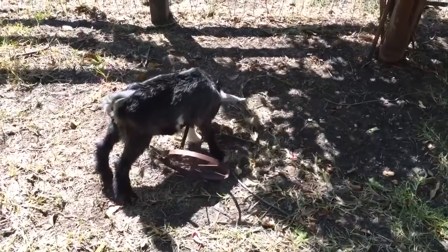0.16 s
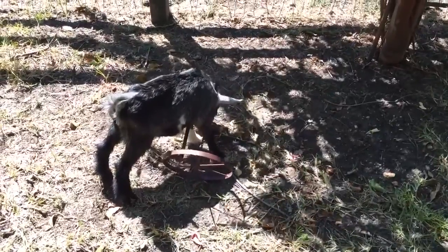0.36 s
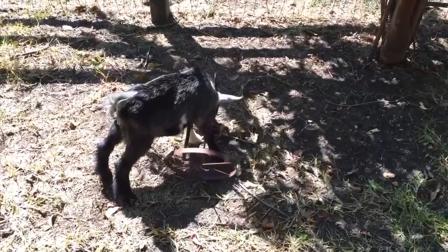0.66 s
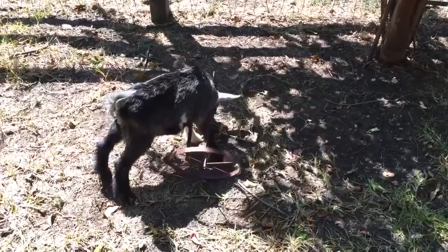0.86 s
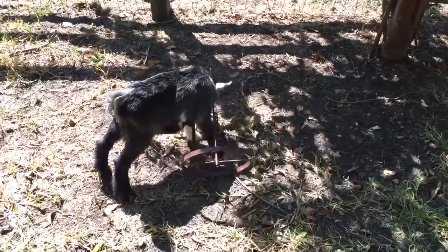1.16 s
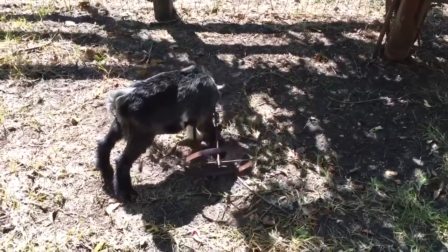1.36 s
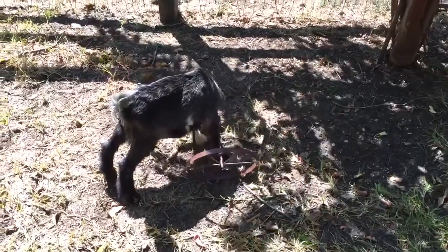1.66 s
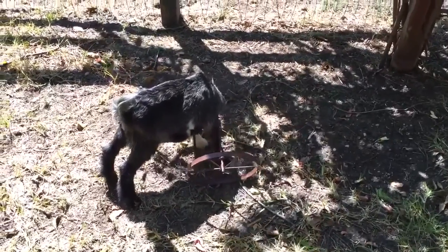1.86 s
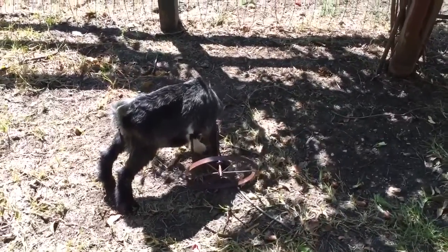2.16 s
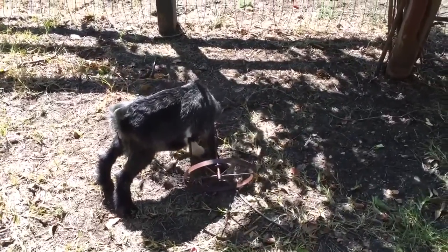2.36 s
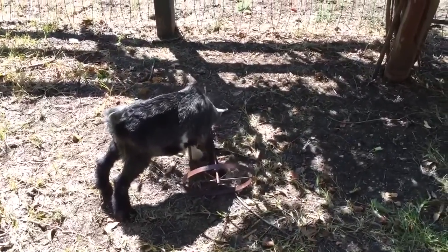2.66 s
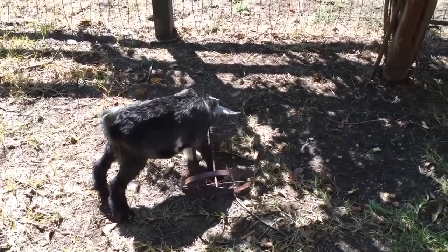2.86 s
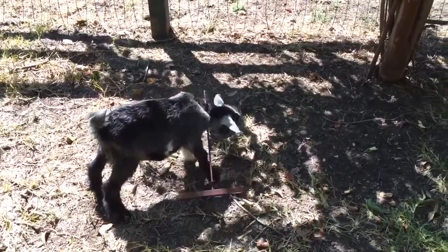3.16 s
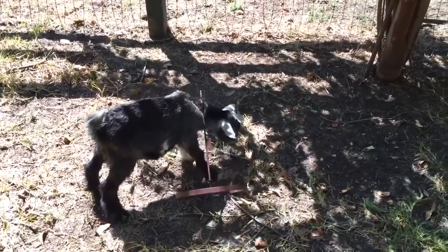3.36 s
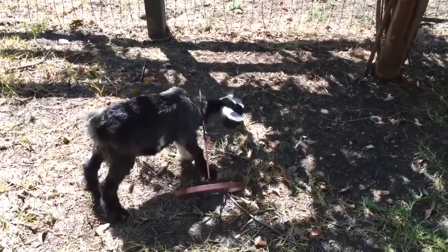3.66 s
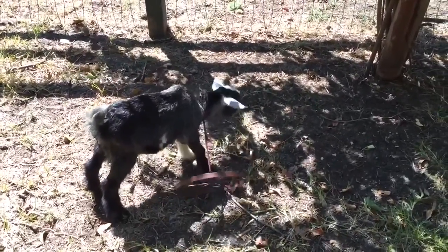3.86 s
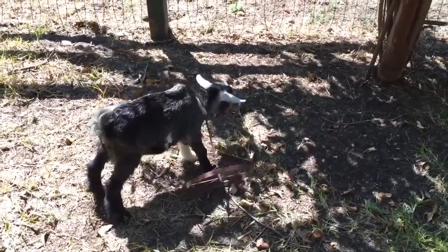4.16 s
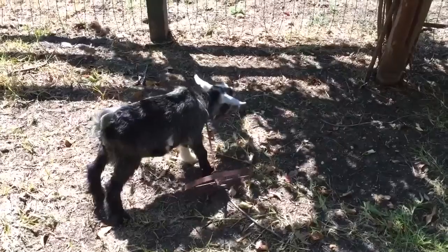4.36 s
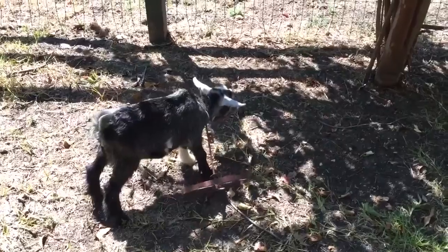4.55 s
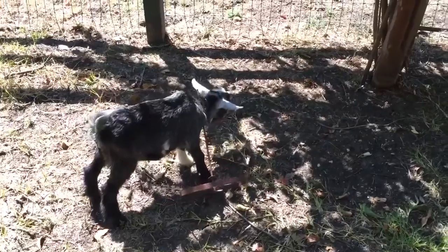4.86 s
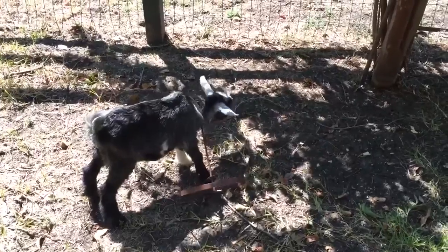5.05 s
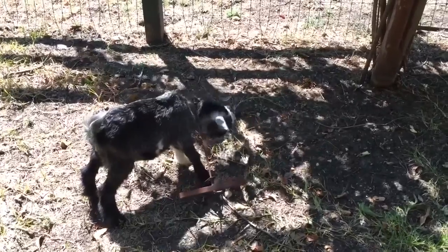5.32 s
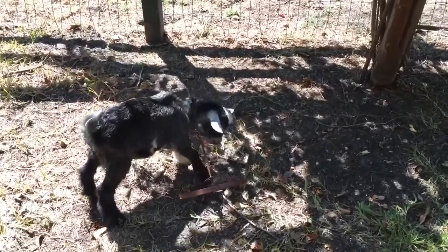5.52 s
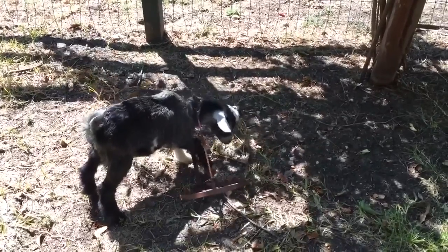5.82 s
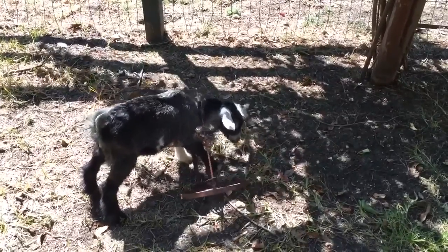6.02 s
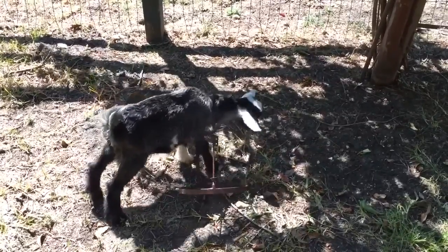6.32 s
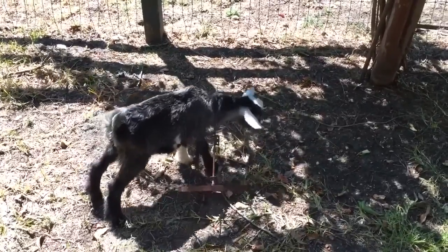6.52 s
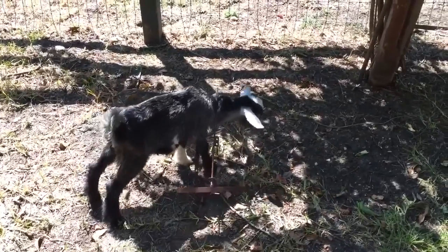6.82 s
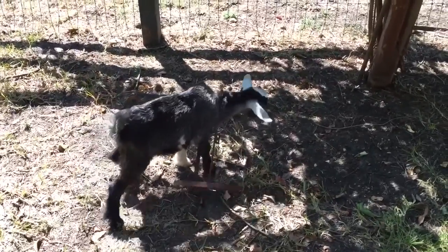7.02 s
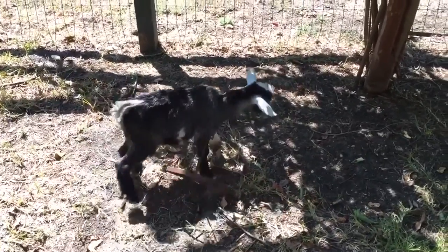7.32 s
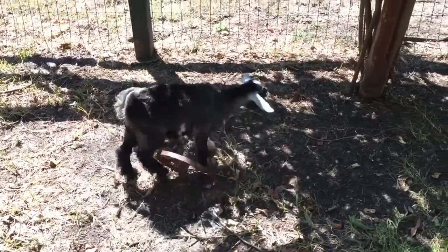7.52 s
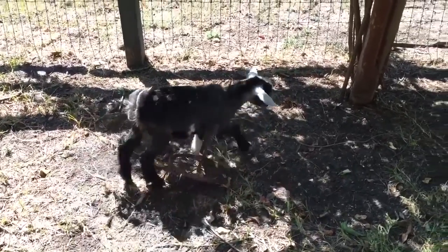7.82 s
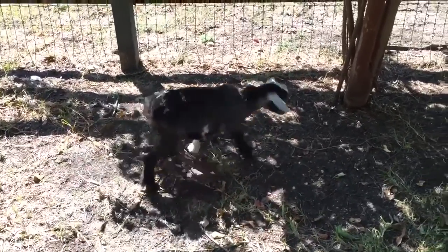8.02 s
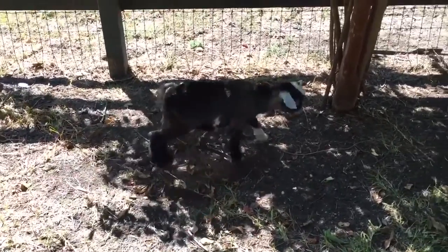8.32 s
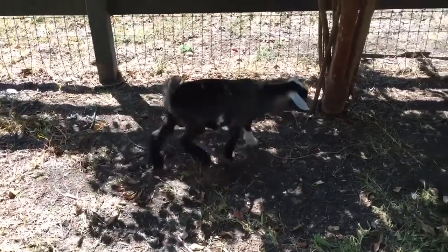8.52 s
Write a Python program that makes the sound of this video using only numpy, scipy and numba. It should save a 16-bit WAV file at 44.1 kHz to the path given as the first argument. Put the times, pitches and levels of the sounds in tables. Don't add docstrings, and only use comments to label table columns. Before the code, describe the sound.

A quiet pen with low distant rumble and thin bird trills, one sharp stick crack, and finally crunching litter with bright iron pings and clinks.

```python
import sys
import numpy as np
from scipy import signal
from scipy.fft import rfft, irfft
from scipy.io import wavfile
from scipy.ndimage import uniform_filter1d
from numba import njit

SR = 44100
rng = np.random.default_rng(int(sys.argv[2]) if len(sys.argv) > 2 else 0)


def undo_db(level):
    steps = np.asarray(level, float) / 20
    return 10 ** steps


def master_out(mix):
    frames = np.transpose(np.atleast_2d(mix))
    ceiling = np.clip(frames, -1, 1)
    pcm = np.round(ceiling * 32767).astype(np.int16)
    wavfile.write(sys.argv[1], SR, pcm)


N = 382788
TIME = np.arange(N) / SR

# hardest_s, build_up_s, die_away_s, scrape_db, rim_weight_db
TUGS = [(1.125, .01, .11, -62, 6), (1.236, .01, .09, -57, -8), (3.084, .005, .04, -57, -6),
        (3.21, .1, .05, -75, -10), (3.664, .006, .1, -62, 6), (3.918, .025, .2, -67, 0),
        (4.0, .15, .08, -66, 0), (4.048, .06, .03, -56, 1), (4.143, .006, .055, -52.5, -14),
        (4.198, .04, .035, -64, -12), (7.148, .2, .1, -64, -10), (7.234, .09, .3, -61.5, -10),
        (7.375, .04, .09, -57, -10), (7.676, .014, .03, -44.5, -6), (7.797, .02, .05, -54, -12),
        (7.821, .03, .12, -47, -8), (7.934, .12, .11, -48, -2), (8.015, .06, .04, -61, -14),
        (8.11, .12, .05, -67, -5), (8.145, .01, .08, -60, -2), (8.188, .08, .075, -54, 2),
        (8.32, .005, .22, -49.5, -6), (8.41, .07, .05, -51, -12), (7.055, .07, .05, -66, -20),
        (7.428, .05, .02, -61, -10), (7.79, .005, .03, -59, -20), (3.462, .035, .01, -62, 6),
        (3.49, .01, .08, -63, 4), (1.06, .12, .08, -69, 3), (7.885, .04, .04, -56, -6),
        (8.26, .05, .1, -68, -10), (4.095, .04, .08, -63, -8), (8.452, .03, .02, -62, -12)]
# pitch_hz, width_hz, level_db
IRON_MODES = [(2320, 34, -7), (3330, 68, -1), (3780, 62, 2), (4470, 47, -20), (5640, 12, -4),
              (6130, 39, -10), (6670, 99, -0.5), (7200, 23, -7.5), (8380, 47, -9), (8500, 63, 0.5),
              (9510, 120, 10), (10900, 60, 0), (11200, 54, -0.5), (11600, 40, -7), (12100, 80, 0.5),
              (13100, 31, -3.5), (14200, 22, -4.5), (14400, 73, -4)]
# pitch_hz, level_db (per Hz)
GRIT_COLOUR = [(3530, -49), (6000, -9), (6300, -6), (7280, 4), (7860, 2), (11300, 7.5), (15700, 2.5)]
# strongest_s, build_up_s, die_away_s, level_db, pitch_hz
RUBS = [(3.95, .03, .04, -70, 6800), (3.99, .06, .05, -70, 7400), (4.0, .08, .08, -70, 9520),
        (4.148, .01, .04, -62, 9300), (4.148, .01, .06, -61, 13100), (4.15, .01, .05, -63, 11200),
        (4.15, .01, .05, -66, 8300), (6.516, .005, .04, -70, 13100), (6.516, .005, .04, -71, 13700),
        (6.52, .005, .04, -73, 12100), (7.1, .03, .06, -70, 9520), (7.15, .04, .1, -64, 9520),
        (7.16, .1, .1, -66, 10900), (7.16, .05, .06, -70, 12600), (7.14, .05, .08, -73, 13700),
        (7.235, .05, .1, -67, 7320), (7.26, .05, .05, -71, 6790), (7.25, .03, .05, -69, 8640),
        (7.21, .02, .1, -68, 11200), (7.25, .02, .04, -68, 15000), (7.25, .05, .06, -69, 13700),
        (7.27, .05, .05, -63, 9520), (7.315, .03, .07, -63, 9520), (7.31, .02, .04, -68, 7320),
        (7.37, .01, .06, -65, 12200), (7.37, .01, .07, -62, 15100), (7.39, .04, .07, -64, 9310),
        (7.388, .01, .03, -68, 5620), (7.825, .015, .1, -56, 7050), (7.83, .02, .12, -56, 10900),
        (7.825, .015, .06, -58, 12100), (7.85, .03, .05, -60, 13600), (7.93, .03, .04, -57, 14500),
        (7.965, .02, .08, -63, 5630), (7.965, .02, .08, -64, 4800), (7.97, .02, .08, -64, 7960),
        (7.96, .02, .06, -63, 11600), (7.97, .02, .08, -64, 14200), (8.345, .02, .1, -56, 11200),
        (8.37, .02, .05, -57, 9150),
        (8.35, .03, .05, -62, 6780), (8.375, .02, .04, -61, 12100), (8.42, .015, .05, -55, 11700),
             (8.435, .01, .045, -62, 13100), (8.44, .03, .1, -63, 9520), (8.4, .01, .06, -58, 15400),
             (8.41, .015, .04, -60, 14200), (8.24, .04, .04, -71, 9520), (8.27, .03, .05, -72, 13100)]
# start_s, peak_db, strongest_hz, ring_t60_s, other_modes_db
CLINKS = [(4.139, -44, 13000, 0.09, -6), (6.1587, -62.5, 10900, 0.09, -10), (6.367, -61, 8300, 0.09, -10),
          (6.5136, -54.5, 11100, 0.11, -12), (6.58, -59.5, 6800, 0.09, -10), (7.1945, -46, 9520, 0.13, -15),
          (7.3632, -45, 13100, 0.18, -15), (7.7957, -43, 6350, 0.09, -13), (7.8176, -37.5, 6370, 0.13, -13),
          (7.9294, -42, 9680, 0.065, -8), (8.0765, -35.5, 11600, 0.075, -32),
          (8.3175, -46, 13100, 0.09, -10), (8.3351, -41, 9510, 0.069, -10), (8.3928, -40, 12100, 0.09, -8),
          (8.4283, -44, 13100, 0.09, -12)]
# start_s, peak_db, treble_centre_hz, rustle_db
TICKS = [(1.0585, -47, 11300, -25), (1.1283, -36.5, 9500, -24), (1.1438, -39, 8420, -22),
         (1.1997, -44, 11200, -21.5), (1.2341, -33.5, 10900, -22), (1.2514, -38, 7070, -18),
         (1.3104, -45, 6200, -22), (1.8058, -44, 14800, -22), (3.0795, -33, 9800, -20),
         (3.1545, -49, 11100, -17), (3.2088, -36.5, 11900, -21), (3.6022, -40, 11000, -26),
         (3.6695, -38, 12500, -22), (3.9105, -49, 6500, -22), (4.0053, -37.5, 6550, -8.5),
         (4.0255, -41, 8420, -22), (4.0487, -38, 9490, -13), (4.1255, -43, 10500, -22),
         (4.1395, -36, 11000, -20), (6.3664, -53.5, 8200, -22), (6.5605, -55, 8330, -12.5),
         (7.2744, -46.5, 9520, -19), (7.5547, -50, 14600, -22), (7.6725, -27.5, 11200, -31),
         (7.6764, -26, 8400, -28), (7.712, -33, 12700, -22), (7.7997, -40, 7060, -22),
         (7.9394, -36, 5640, -15), (8.1424, -50, 7960, -22), (8.2094, -45, 5930, -20),
         (0.9572, -56, 12700, -13), (1.0405, -61, 11400, -17), (1.0884, -59, 11770, -20),
              (1.1114, -57, 10900, -24), (1.497, -59, 13600, -20), (3.8072, -49, 13600, -16),
              (3.9515, -46, 11000, -20), (5.4784, -56, 14400, -20), (5.5159, -63, 11600, -20),
              (5.5817, -64, 11200, -20), (5.9923, -64, 15300, -21), (0.9617, -54, 12500, -18),
              (1.003, -63, 9500, -20), (3.112, -58, 12000, -20), (3.489, -48, 6500, -12),
              (4.0028, -48, 9000, -20), (6.567, -58, 11000, -20), (7.0532, -57, 14500, -14),
              (7.765, -56, 8000, -20), (7.401, -54, 8000, -20), (7.424, -52, 8500, -20),
              (7.944, -42, 8000, -20), (8.3925, -42, 12000, -18)]
# start_s, peak_db, pitch_hz, t60_s
KNOCKS = [(1.128, -32, 3400, .006), (1.234, -52, 3800, .006), (1.251, -39, 2720, .008),
          (1.403, -50, 2040, .012), (3.0797, -30, 5200, 0.0025), (3.478, -30, 1500, .012),
          (3.6022, -45, 2400, 0.0025), (3.6699, -27, 1380, 0.0055), (3.6695, -27, 2400, 0.0055),
          (4.051, -29, 2600, 0.003), (4.0513, -30, 3900, 0.003), (7.675, -40, 3000, 0.011),
          (3.4633, -14, 1500, .0016), (3.6695, -28, 6750, .0028), (3.6695, -26, 9300, .0025),
          (3.6696, -34, 3100, .004), (3.67, -38, 800, .008), (3.0797, -40, 2700, .005),
          (7.363, -52, 11300, .1), (7.94, -40, 2300, 0.0099), (3.4777, -18.5, 6200, 0.0025),
          (3.478, -21.5, 9700, 0.0022), (3.4777, -31, 12700, .002), (2.938, -63, 4270, 0.043),
          (7.84, -57, 1285, 0.22), (7.9, -54.5, 2320, 0.14), (8.345, -58, 1443, 0.2),
          (8.33, -47.5, 3780, 0.12), (7.8, -52, 3780, .08)]
# pitch_hz, width_hz, level_db
SNAP_MODES = [(1270, 330, 0), (2390, 520, -5), (6030, 1500, -15), (12000, 4000, -22)]
# kind, start_s, first_hz, last_hz, level_db
PHRASES = [
    [("trill", 2.076, 3550, 3310, -64), ("warble", 2.243, 3310, 3340, -61.5),
     ("clear", 2.335, 3270, 3440, -58.5)],
    [("chip", 2.77, 3750, 3600, -78), ("chip", 2.808, 3520, 3450, -64), ("trill", 2.828, 3300, 3270, -55),
     ("chip", 2.912, 3400, 3560, -66), ("warble", 2.959, 3370, 3280, -58.5),
     ("clear", 3.089, 3326, 3305, -49.5)],
    [("chip", 3.812, 3700, 3650, -64), ("chip", 3.835, 3550, 3500, -68), ("trill", 3.853, 3300, 3350, -60),
     ("chip", 3.917, 3340, 3400, -59), ("warble", 3.948, 3380, 3350, -66),
     ("trill", 4.003, 3400, 3380, -66), ("clear", 4.095, 3310, 3295, -55)],
    [("chip", 5.265, 3720, 3680, -68), ("warble", 5.343, 3320, 3330, -70),
     ("warble", 5.438, 3310, 3290, -66.5), ("clear", 5.59, 3200, 3215, -61)],
    [("trill", 6.087, 3900, 3860, -70), ("trill", 6.188, 3620, 3380, -72),
     ("warble", 6.329, 3400, 3380, -67), ("clear", 6.426, 3270, 3250, -64)],
    [("trill", 8.225, 3300, 3190, -60.5), ("warble", 8.33, 3310, 3340, -58.5),
     ("clear", 8.454, 3240, 3310, -54)],
]
NOTE_KINDS = {"chip": (30, .032, .006, -2), "trill": (110, .125, .012, 0), "warble": (27, .14, .018, -2),
              "clear": (12, .052, .004, 1)}
# start_s, clear_s, blurred_s, second_partial_hz, level_db
CALLS = [
    (.84, .095, .18, 2900, -60.5),
    (1.122, .062, .045, 2548, -56.5),
]
# multiple, level_db, split_share (in the blur)
CALLER_PARTIALS = [(1, -17, .3), (1.5, -19, 0), (2, 0.5, .8), (2.5, -20, .3), (3, -11.5, 0), (4, -21, .6),
                   (4.5, -21, .3)]
# strongest_s, build_up_s, die_away_s, level_db
PUFFS = [
    (.07, .06, .05, -46),
    (.148, .08, .04, -46),
    (.274, .036, .04, -31.5),
    (.56, .065, .015, -52),
    (.672, .04, .055, -32),
    (1.806, .045, .022, -50),
    (1.905, .03, .08, -41.5),
]
# time_s, centre_hz, level_db
DRONE = [(0.0, 62, -46), (0.3, 70, -49), (0.48, 78, -70), (0.85, 75, -66), (1.11, 78, -48),
         (1.96, 77, -45.5), (2.15, 75, -52), (2.3, 94, -49), (3.09, 96, -51), (3.3, 85, -58),
         (4.0, 90, -54), (4.3, 72, -53), (4.72, 90, -55), (5.0, 64, -59), (5.5, 74.5, -48.5),
         (6.88, 72, -51), (7.2, 74, -57.5), (8.68, 73, -49.5)]
# pitch_hz, level_db (per Hz)
AIR_COLOUR = [(30, 10.5), (70, 14), (130, 11), (200, 5.5), (320, -1.5), (480, -5.5), (650, -1.5), (900, -2),
              (1300, -7), (2000, -13.5), (2900, -16.5), (5900, -18), (8000, -23.5), (15700, -29.5)]
# pitch_hz, width_hz, level_db
INSECTS = [(3900, 600, -81), (5700, 900, -86.5)]


def drag():
    tugs, weight_db = swells(TUGS), np.transpose(TUGS)[4]
    scrape, heavy, rough = (stretch(undo_db(k * weight_db) @ tugs) + 1e-9 for k in (0, 1, .45))
    grain_size = undo_db(2.0 * np.minimum(rng.exponential(size=N), 5.5))
    grit = unit(noise() * (rng.random(N) < .3) * grain_size)
    push = scrape * undo_db(1.5 * walk(140))

    hiss_bands = octaves(unit(colour(grit, GRIT_COLOUR)), 4470, 0.31)
    hiss = sum(undb(2.1 * walk(45)) * part for part in hiss_bands)
    crunch = heavy / scrape * undo_db(-3.5) * unit(steep_band(grit, 2450, 2200))
    rasp = rough / scrape * undo_db(-5 + 2.9 * walk(50)) * unit(steep_band(grit, 4050, 4100))

    pings = np.zeros(N)
    for when, mode, detune, size, damp in rng.random((3000, 5)):
        s = 3.9 + 4.7 * when
        i = int(s * SR)
        hz, _, db = IRON_MODES[int(mode * len(IRON_MODES))]
        if scrape[i] > undo_db(-95):
            pitch_hz = hz * (1 + 0.39 * (detune - .5) ** 3)
            t60 = .025 + 0.09 * damp ** 2
            add(pings, s, push[i] * undo_db(.5 * db - 11 * size) * ring(pitch_hz, t60, .08))
    return undo_db(-3.5) * push * (hiss + crunch + rasp) + undo_db(-4.8) * pings


def rubs():
    width_hz, level_db = 50, 1.2
    out, rows, lead = np.zeros(N), RUBS, int(.15 * SR)
    grits = rng.standard_normal((len(rows), 3 * lead))
    for row, gain, grit in zip(rows, swells(rows), grits):
        i = int(row[0] * SR) - lead
        push = stretch(gain)[i:i + 3 * lead]
        tone = band(push * grit[:len(push)], row[4], width_hz)
        add(out, i / SR, undo_db(level_db) * tone / np.sqrt(np.pi * width_hz / SR))
    return out


def clinks():
    out = np.zeros(N)
    soft = 1 - np.exp(-TIME[:int(.3 * SR)] / .001)
    for s, db, hz, t60, rest_db in CLINKS:
        rest = 0
        for mode_hz, _, mode_db in IRON_MODES:
            luck, detune = rng.standard_normal(2)
            if mode_hz > 6000:
                far_db = 9 * abs(np.log2(mode_hz / hz))
                gain = undo_db(rest_db + 0.5 * mode_db + 3.3 * luck - far_db)
                rest = rest + gain * ring(mode_hz * (1 + 0.0033 * detune), t60)
        pair = ring(hz, t60) + .45 * ring(1.022 * hz, .6 * t60)
        add(out, s, undo_db(db - 10.5) * soft * (pair + rest))
    return out


def ticks():
    out, t = np.zeros(N), TIME[:1500]
    for s, db, hz, rustle_db in TICKS:
        burst = rng.standard_normal((2, len(t)))
        crack = steep_band(burst[0] * np.exp(-t / 0.00063), hz, 11000)
        rustle = undo_db(rustle_db) * band(burst[1], hz, 9000) * np.exp(-t / 0.015)
        add(out, s, undo_db(db) * (crack / np.abs(crack).max() + rustle))
    onset = 1 - np.exp(-TIME[:int(.12 * SR)] / 0.00015)
    for s, db, hz, t60 in KNOCKS:
        add(out, s, undo_db(db) * ring(hz, t60, .12) * onset)
    return out


def snap():
    snap_s, snap_db = 3.4635, -6.9
    out, t = np.zeros(N), TIME[:9000]
    swing = 0
    for k, (hz, width_hz, db) in enumerate(SNAP_MODES):
        build_up = 1 - np.exp(-t[:int(.03 * SR)] * hz / 0.31)
        sign = -(-1) ** k
        swing = swing + sign * undo_db(db) * ring(hz, np.log(1000) / np.pi / width_hz, .03) * build_up
    add(out, snap_s, undo_db(snap_db) * swing / np.abs(swing).max())

    scatter = band(band(rng.standard_normal(len(t)), 1100, 1200), 1200, 1500)
    scatter = scatter * (np.exp(-t / 0.0093) + .03 * np.exp(-t / .11))
    splinters = band(band(rng.standard_normal(len(t)), 3900, 3000), 4800, 3996)
    splinters = splinters * np.exp(-((t - .011) / 0.005) ** 2)
    add(out, snap_s, undo_db(-18.5) * scatter + undo_db(-36) * splinters)
    return out


def whistling_bird():
    return voice(song_notes(), [(1, 0, 0)], base=1, warble_rate=48, flutter_db=2.4,
                 hoarse=0.45, rising=.8, split_hz=100)


def song_notes():
    after_s, after_db, after_trill_hz = .14, -13.5, 19
    notes = []
    for phrase in PHRASES:
        nexts = [note[1] for note in phrase[1:]] + [np.inf]
        for (kind, start, first_hz, last_hz, db), after in zip(phrase, nexts):
            trill, longest, breath, change_db = NOTE_KINDS[kind]
            end = max(min(start + longest, after - breath), start + .01)
            notes.append([(start, first_hz, db - change_db / 2, trill),
                          (end, last_hz, db + change_db / 2, trill)])
        notes.append([(end + breath, last_hz, db + after_db, after_trill_hz),
                      (start + after_s, last_hz, db + after_db - 5, after_trill_hz)])
    return notes


def hoarse_caller():
    return voice(call_notes(), CALLER_PARTIALS, base=.5, warble_rate=37, flutter_db=3.4,
                 hoarse=0.45, rising=.55, split_hz=85)


def call_notes():
    attack_s, break_s, sag_db, blur_db = .016, .022, -1.5, -7.5
    clear_hz, blur_hz, arch_hz_per_s = 8, 45, 330
    notes = []
    for s, clear, blurred, hz, db in CALLS:
        arch = arch_hz_per_s * blurred
        low, clear_end = hz - arch / 2, s + clear
        blur_end = clear_end + max(blurred, break_s + .002)
        notes.append([(s, low, db - 8, clear_hz),
                      (s + attack_s, low, db, clear_hz),
                      (clear_end, hz + arch / 2, db + sag_db, clear_hz),
                      (clear_end + break_s, hz + arch, db + blur_db, blur_hz),
                      (blur_end, low, db + blur_db / 2, blur_hz / 2)])
    return notes


def voice(tables, partials, base, warble_rate, flutter_db, hoarse, rising, split_hz):
    hz, db, depth_hz, gate = curves(tables)
    turn = np.cumsum(warble_rate * (1 + 0.0993 * walk(15))) / SR
    warble = signal.sawtooth(2 * np.pi * turn, rising) + 0.3 * walk(160)
    effort = depth_hz / depth_hz.max()
    phase = 2 * np.pi * np.cumsum(base * (hz + depth_hz * warble)) / SR
    second = 2 * np.sin(2 * np.pi * np.cumsum(split_hz * (1 + .2 * walk(25))) / SR) - 1
    song = 0
    for multiple, level_db, split in partials:
        flutter = undb(level_db + flutter_db * walk(45))
        roughness = 1 + hoarse * effort ** .5 * walk(300)
        beating = 1 + split * effort ** 2 * second
        song = song + flutter * roughness * beating * np.sin(multiple * phase)
    dip = 1 - .42 * effort * np.cos(np.pi * turn) ** 4
    tone = gate * undo_db(db + 3.5) * dip * song
    echoes = sum(undo_db(-11 - 190 * lag) * np.roll(tone, int(lag * SR)) for lag in (.011, .019, .032, .047, .071))
    return tone + echoes


def wind():
    rush = colour(noise(), [(30, -7.5), (80, 4.5), (150, 1), (300, -15), (520, -29), (2000, -70)])
    return stretch(swells(PUFFS).sum(axis=0)) * undo_db(2.5) * unit(rush)


def drone():
    hz, db, _ = curves([DRONE])
    rumble = undo_db(2.2 * walk(11)) * unit(band(band(noise(), 91.4, 48), 76, 60))
    hum = unit(svf(svf(noise(), hz, 17.0), hz, 21.0))
    return undo_db(db - 0.5) * unit(hum + .6 * rumble)


def air():
    wash, swell = colour(noise(), AIR_COLOUR), walk(0.15)
    parts = octaves(wash / np.std(band(wash, 1775, 22000)), 43.4, 0.471)
    moving = sum(undb((0.86 * swell + 3.1 * walk(9)) * .88 ** k) * part for k, part in enumerate(parts))
    insects = sum(undb(db + 1.2 * walk(3)) * unit(steep_band(noise(), hz, width_hz))
                  for hz, width_hz, db in INSECTS)
    passing = np.exp(-((TIME - .8) / 0.67) ** 2) * unit(steep_band(noise(), 550, 350))
    return insects + undo_db(-67) * passing + undo_db(-61.6) * moving


def murmur():
    out = np.zeros(N)
    for hz in (520, 620, 700, 790, 880, 1050, 1230):
        wandering_hz = hz * 2 ** (.1 * walk(6))
        out += undb(-82.5 + 5.3 * walk(26)) * unit(svf(noise(), wandering_hz, 55.))
    return out


def unit(x):
    return x / np.sqrt(np.mean(x ** 2))


def undb(db):
    return np.exp(db * (np.log(10) / 20))


def noise():
    return rng.standard_normal(N)


def walk(rate):
    k = int(SR / rate)
    held = np.repeat(rng.standard_normal(N // k + 1), k)
    return 1.3 * uniform_filter1d(uniform_filter1d(held, k), k)[:N]


def curves(tables):
    rows = np.concatenate(sorted(tables))
    inside = sum((TIME >= t[0][0]) & (TIME <= t[-1][0]) for t in tables)
    gate = uniform_filter1d(1. * (inside > 0), size=550)
    return [np.interp(TIME, rows[:, 0], column) for column in rows.T[1:]] + [gate]


def swells(rows):
    peak, rise, fall, db = np.transpose(rows)[:4, :, None]
    late = TIME[::16] - peak
    shape = undb(-20 * np.abs(late) / np.clip(np.where(late < 0, rise, fall), .003, 1))
    return undo_db(db) * np.clip(shape - undo_db(-32), 0, 1)


def stretch(coarse):
    return np.interp(TIME, TIME[::16], coarse)


def colour(x, points):
    hz, db = np.transpose(points)
    bins = np.arange(N // 2 + 1) * SR / N + 1
    return irfft(rfft(x) * undo_db(np.interp(np.log(bins), np.log(hz), db)), N)


def octaves(x, low_hz, step):
    place = np.log2((np.arange(N // 2 + 1) * SR / N + 1) / low_hz) / step
    count, spectrum = int(place[-1]), rfft(x)
    place = np.clip(place, 0, count)
    return [irfft(spectrum * np.clip(1 - np.abs(place - k), 0, 1), N) for k in range(count + 1)]


@njit
def svf(x, hz, width):
    y, b, l, last, g, k = np.empty(len(x)), 0., 0., 0., 0., 0.
    for i in range(len(x)):
        if hz[i] != last:
            last, g, k = hz[i], np.tan(np.pi * hz[i] / SR), width / hz[i]
        v = (b + g * (x[i] - l)) / (1 + g * (g + k))
        b, l, y[i] = 2 * v - b, l + 2 * g * v, k * v
    return y


def band(x, hz, width):
    return svf(x, np.full(len(x), 1. * hz), 1. * width)


def steep_band(x, hz, width):
    return band(band(x, hz, width), hz, width)


def ring(hz, t60, length=.3):
    t = TIME[:int(length * SR)]
    return np.sin(2 * np.pi * hz * t) * np.exp(-np.log(1000) * t / t60)


def add(out, s, sound):
    i = int(s * SR)
    out[i:i + len(sound)] += sound[:N - i]


def scene():
    wheel = drag() + rubs() + clinks()
    litter = ticks() + snap()
    birds = whistling_bird() + hoarse_caller()
    background = wind() + drone() + air() + murmur()
    return (wheel + litter + birds + background)[None]


def top_cut(x):
    return signal.sosfilt(signal.butter(12, 16660, fs=SR, output="sos"), x)


def record(dry):
    edge_hz = 15850
    response = [(15, -30), (30, -9), (48, 0), (9500, 0), (10500, -3), (11500, 0),
                (edge_hz, 0), (1.006 * edge_hz, -24), (20000, -30)]
    heard = colour(dry[0], response)
    return top_cut(heard[None])


dry = scene()
out = record(dry)
master_out(out)
```